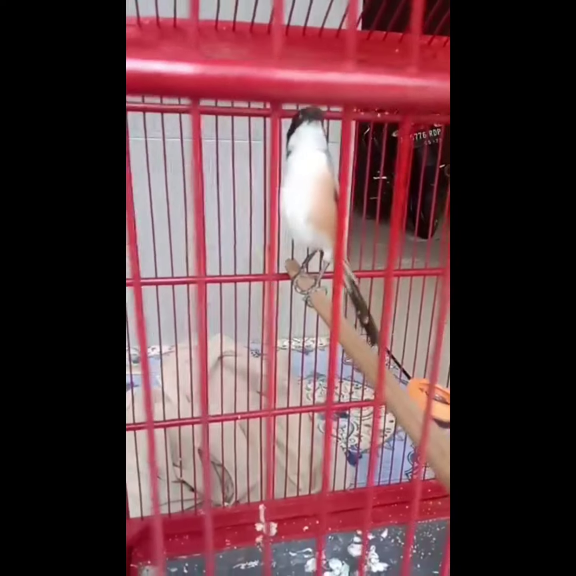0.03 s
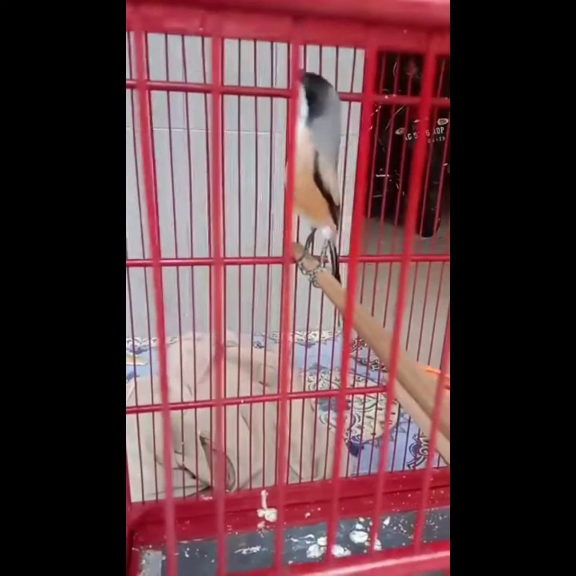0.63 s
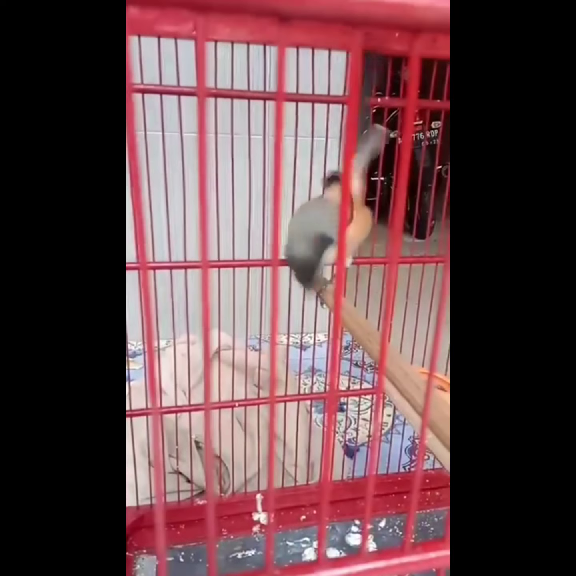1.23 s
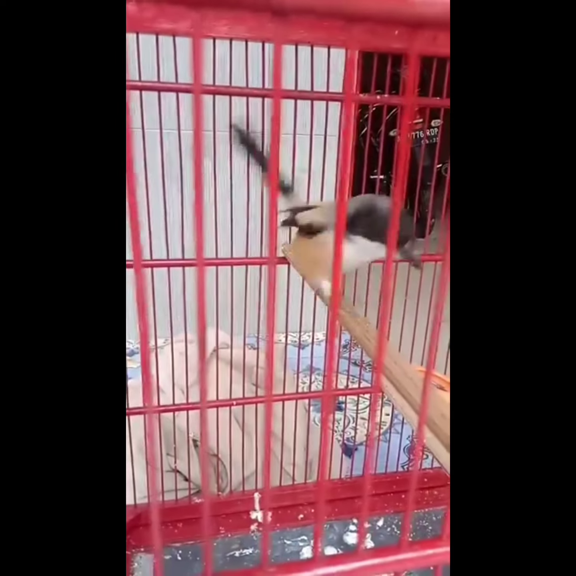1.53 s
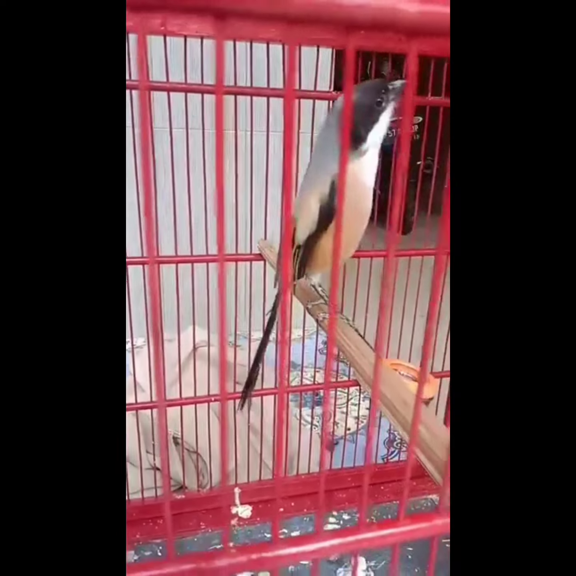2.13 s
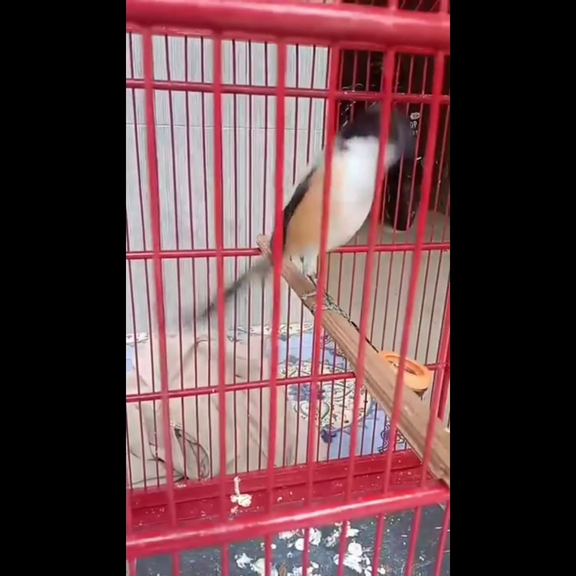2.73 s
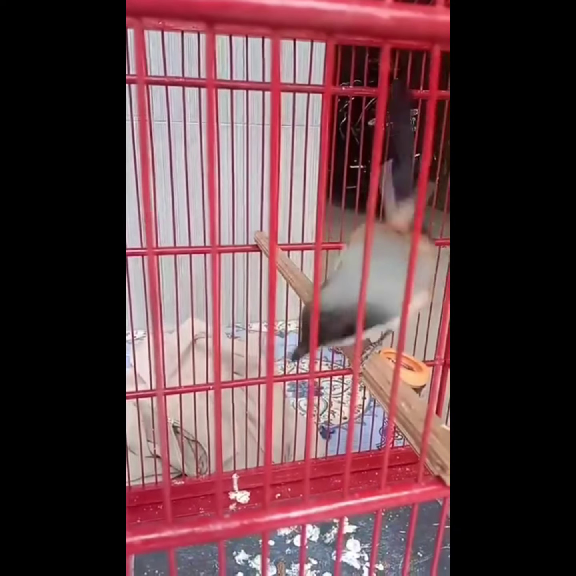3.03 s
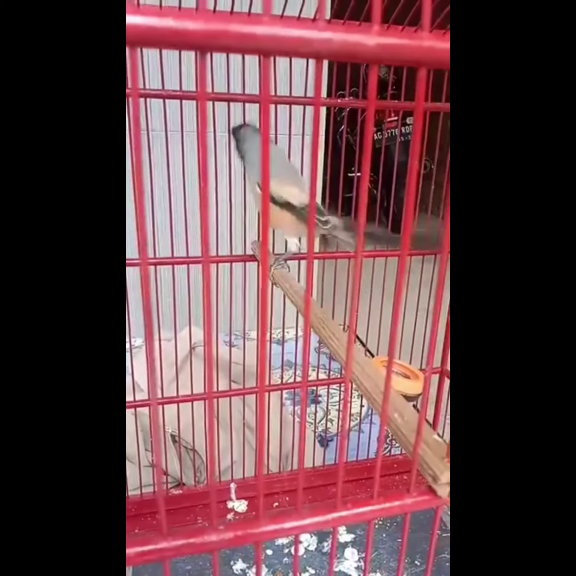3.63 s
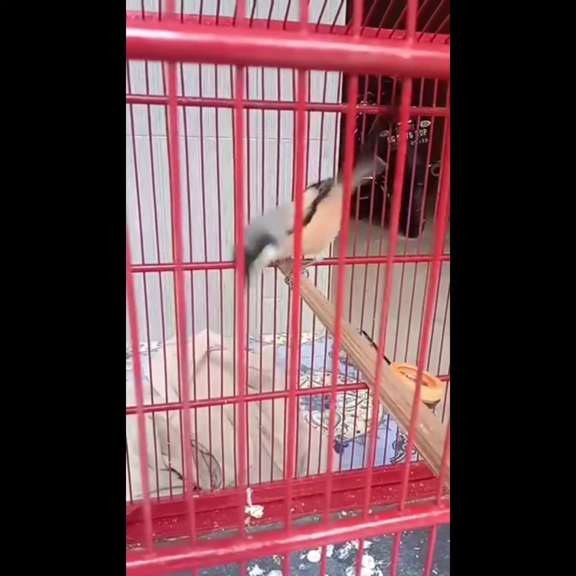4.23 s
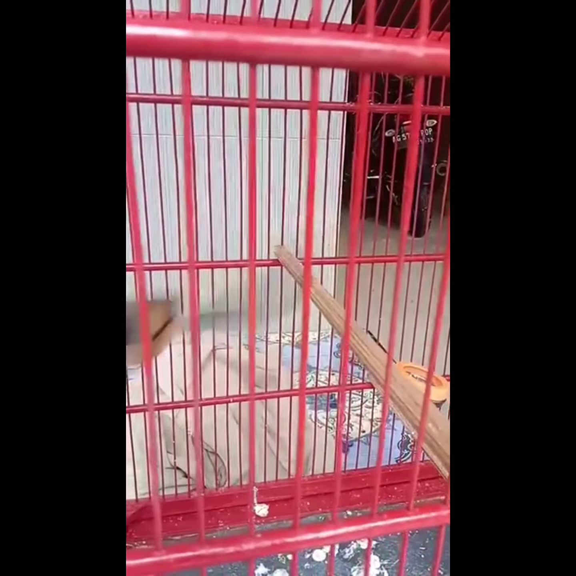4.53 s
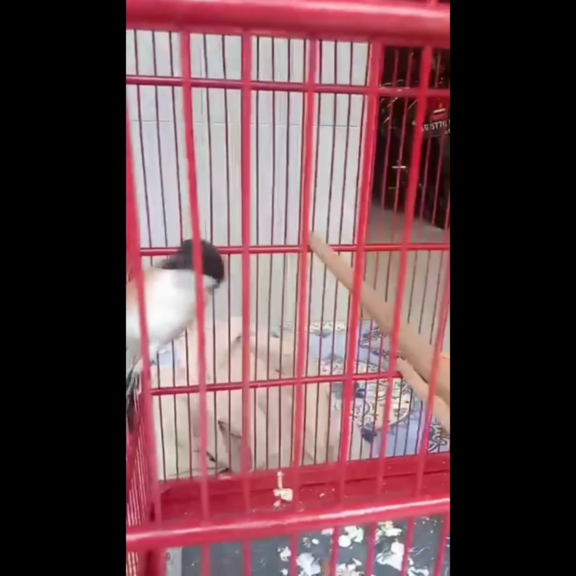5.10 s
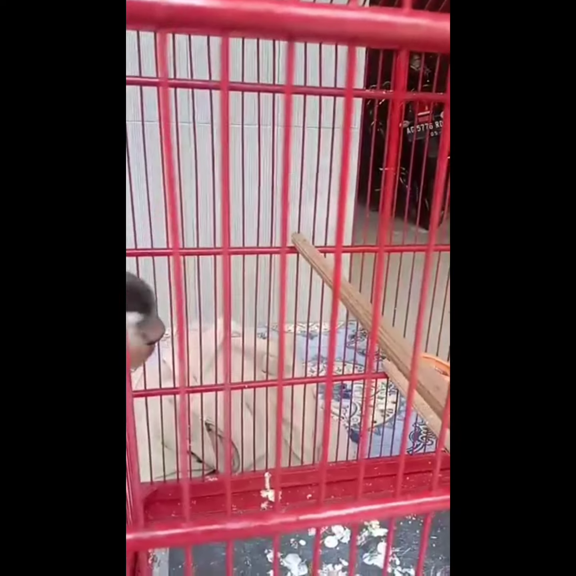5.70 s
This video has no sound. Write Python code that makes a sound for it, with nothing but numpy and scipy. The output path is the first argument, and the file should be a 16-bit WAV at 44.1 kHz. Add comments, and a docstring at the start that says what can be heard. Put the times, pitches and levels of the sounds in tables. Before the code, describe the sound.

A caged songbird sings close to the microphone on a porch, with only a slight echo. It opens with one short peep over faint outdoor hiss and a low, motor-like hum that drops back after half a second. Five bright, high chirps, each a tiny rapid trill, come at about 0.5, 1.2, 1.6, 2.2 and 2.9 seconds. Dry swishes, like wings or a broom, pass among them, clearest around 1.1, 1.8, 2.5 and 3.7 seconds, and set the cage wires ringing faintly. From 3.3 seconds the bird breaks into quick, harsh chatter: twelve pairs of rasping notes, about five pairs a second, each note opened by a tiny tick. The chatter stops near 5.6 seconds. Very soft, distant dove-like coos appear now and then, near the start and around 2.5 and 5.2 seconds. The pauses between calls are hushed and dull.

```python
"""A caged shrike sings close by on a porch. First come a low, motor-like hum, the last syllable of a chirp and
soft, distant cooing like a dove's. From 0.5 s the bird gives five twittering chirps, among dry swishes as of
wings or a broom. The swishes set the cage wires ringing faintly. From 3.3 s the bird breaks into quick, harsh
pairs of notes, each opened by a tick. Both sides of its voice box (the syrinx) sound at once, so this chatter
beats and rasps. A noise suppressor darkens the pauses."""
import sys
import numpy as np
from scipy import signal
from scipy.fft import rfft, irfft, next_fast_len
from scipy.io import wavfile
from scipy.ndimage import uniform_filter1d, minimum_filter1d

SR = 44100
rng = np.random.default_rng(int(sys.argv[2]) if len(sys.argv) > 2 else 0)


def log_audio(samples):
    """Write samples as a 16-bit WAV file to the path given in sys.argv[1]."""
    # one column per channel
    frames = np.atleast_2d(samples).T
    # limit to full scale, then quantise
    limited = np.clip(frames, -1, 1)
    pcm = np.round(limited * 32767).astype(np.int16)
    wavfile.write(sys.argv[1], SR, pcm)


N = 258426
TIME = np.arange(N) / SR


def amp(db):
    """Turns decibels into a number to multiply by."""
    return 10 ** (np.asarray(db) / 20)


def unit(x):
    """Scales a signal to an average strength (rms) of 1."""
    return x / np.sqrt(np.mean(abs(x) ** 2) + 1e-20)


def value_at(points, hz):
    """Reads between (f/Hz, value) rows, giving each octave equal room."""
    f, value = np.transpose(points)
    return np.interp(np.log(hz + 1), np.log(f + 1), value)


def level_curve(rows):
    """Joins (t/s, level/dB) rows into a volume curve for the whole scene."""
    return amp(np.interp(TIME, *np.transpose(rows)))


def colour(x, points):
    """Turns each frequency up or down by (f/Hz, level/dB) rows."""
    size = next_fast_len(len(x) + 4096)
    gain = amp(value_at(points, np.fft.rfftfreq(size, 1 / SR)))
    return irfft(rfft(x, size) * gain, size)[:len(x)]


def noise(points):
    """Noise of strength 1, coloured by (f/Hz, level/dB) rows."""
    return unit(colour(rng.standard_normal(N), points))


def wander(count, rate_hz):
    """A smooth random wobble of strength 1, mostly slower than rate_hz."""
    hz = np.fft.rfftfreq(count + 4096, 1 / SR)
    spectrum = rfft(rng.standard_normal(count + 4096))
    return unit(irfft(spectrum * np.exp(-(hz / rate_hz) ** 2)))[:count]


def tone(hz):
    """A pure tone that follows a pitch curve; .real gives the wave one hears."""
    return np.exp(2j * np.pi * (np.cumsum(hz) / SR + rng.random()))


def edges(t, length, rise, fall):
    """A soft fade in and out, half open at 0 and at length."""
    return (1 + np.tanh(t / rise)) * (1 + np.tanh((length - t) / fall)) / 4


def add(mix, start_s, sound):
    """Adds a sound to the mix, dropping whatever sticks out at either end."""
    start = round(start_s * SR)
    sound = sound[..., max(-start, 0):]
    part = mix[..., max(start, 0):][..., :sound.shape[-1]]
    part += sound[..., :part.shape[-1]]


# Colour of the outdoor air: f/Hz, relative level/dB
AIR_COLOUR = [(30, -13), (150, -6.5), (300, -10), (800, -14.5), (1500, -14.5), (2200, -11), (3100, 3),
              (4500, -3), (7000, -0.5), (8200, -8), (10000, -26), (15500, -30)]
# Tones in the hum: f/Hz, level/dB
HUM_TONES = [(80.7, -71.5), (123.8, -63.5), (161.5, -73.5)]
# How the hum is turned up and down: t/s, level change/dB
HUM_VOLUME = [(.12, 1.5), (.16, -12.5), (.28, -2.5), (.49, -1), (.54, -9), (2.6, -12), (3.2, -16.5)]
def background(air_db=-52.5):
    """Steady outdoor air and a low, motor-like hum that is loudest at the start."""
    hum = np.zeros(N)
    for hz, db in HUM_TONES:
        hum += np.sqrt(2) * amp(db) * tone(hz * (1 + .016 * wander(N, rate_hz=14))).real
    air = noise(AIR_COLOUR) * amp(air_db + .8 * wander(N, rate_hz=20))
    return air + level_curve(HUM_VOLUME) * hum


# Dove-like calls: t/s, length/s, f/Hz, level/dB
DISTANT_COOS = [(0.061, 0.0604, 485.8, -58.5), (.12, 0.0704, 575, -65.5), (.225, 0.141, 465, -69.5),
                (1.613, 0.0616, 600, -66), (2.363, 0.0282, 487.6, -66), (2.528, 0.1097, 464, -59.5),
                (2.607, .13, 469.5, -67.5), (4.114, 0.075, 596, -74.5), (4.227, 0.0625, 583, -64.5),
                (4.65, 0.044, 474.8, -69.5), (4.954, 0.043, 492.6, -68), (5.129, 0.0352, 580, -68),
                (5.244, 0.1135, 481.1, -55), (5.67, 0.038, 581.7, -67.5)]
def coos(sag_hz_per_s=120):
    """Soft calls from far away, blurred and fluttering after travelling many paths."""
    out = np.zeros(N)
    for start, length, hz, db in DISTANT_COOS:
        t = np.arange(-.03, length + .08, 1 / SR)
        pitch = hz - sag_hz_per_s * (t - length / 2)
        call = tone(pitch * (1 + .018 * wander(len(t), rate_hz=60))).real
        gain = amp(db + 2 * wander(len(t), rate_hz=45)) * edges(t, length, rise=.008, fall=.0089)
        add(out, start + t[0], np.sqrt(2) * call * gain)
    return out


# Colours of the hollow scrape and the bristly hiss: f/Hz, relative level/dB
SCRAPE_COLOUR = [(200, -39), (680, -40), (840, -4), (1000, -16), (1130, -10.5), (1300, -1.5), (1600, 3.5),
                 (1850, -2), (2100, 3), (3200, -34)]
HISS_COLOUR = [(1200, -33.5), (2400, -8), (3200, -4.5), (4600, -4.5), (6000, -6), (7800, -6), (9000, -8),
               (11500, -27), (15500, -29.5)]
# Dry strokes: t/s, length/s, scrape level/dB, hiss level/dB
STROKES = [(0.705, 0.06, -66, -54.5), (1.064, 0.114, -50, -41), (1.203, 0.135, -56, -49),
           (1.791, 0.111, -60, -45), (2.445, 0.138, -46.5, -41.5), (3.173, 0.039, -75, -50.5),
           (3.675, 0.09, -54.5, -35.5), (4.404, 0.039, -47, -52)]
def swishes(lead_s=.015):
    """A bristly hiss opens and closes each stroke; a hollow scrape fills its middle."""
    scrape, hiss, out = noise(SCRAPE_COLOUR), noise(HISS_COLOUR), np.zeros(N)
    for start, length, scrape_db, hiss_db in STROKES:
        t = TIME - start
        out += amp(scrape_db) * scrape * edges(t, length, rise=.025, fall=.014)
        out += amp(hiss_db) * hiss * edges(t + lead_s, length + 2 * lead_s, rise=.025, fall=.032)
    flutter_db = .5 * wander(N, rate_hz=40) + 2.2 * wander(N, rate_hz=150)
    return out * amp(flutter_db)


def syrinx(voices, gain, overtone_db, rasp_db, roughness):
    """The voice box. Gives three rows: voices, overtones from its colliding membranes, airflow strength."""
    pressure = amp(.4 * (overtone_db + 18.5))  # pushing harder lifts the highest overtones most
    overtones = unit(voices ** 2) + pressure * (.71 * unit(voices ** 3) + .33 * unit(voices ** 4))
    uneven_collisions = np.exp(1j * roughness * wander(len(gain), rate_hz=980))
    overtones = amp(overtone_db) * np.sqrt(2) * (overtones * uneven_collisions).real
    airflow = amp(rasp_db) * abs(unit(voices))
    return gain * np.array([unit(voices.real), overtones, airflow])


def syllable(song, start, length, start_hz, end_hz, db, lower_db):
    """Adds a nearly pure sliding whistle over a weak, unsteady lower voice that arches in pitch."""
    t = np.arange(-.005, length + .008, 1 / SR)
    off_centre = np.clip(2 * t / length - 1, -1, 1) ** 2  # 0 in the middle, 1 at the ends
    hz = np.interp(t, [0, length], [start_hz, end_hz])
    whistle = tone(hz * (1 + .021 * wander(len(t), rate_hz=550)))
    lower = tone((.8 - .18 * off_centre) * hz * (1 + .092 * wander(len(t), rate_hz=850)))
    lower *= amp(lower_db - 2.5 + 7 * wander(len(t), rate_hz=13))
    swell_db = 2 - 4 * off_centre + 1.1 * wander(len(t), rate_hz=38)
    gain = amp(db + swell_db) * edges(t, length, rise=.0011, fall=.0018)
    add(song, start + t[0], syrinx(whistle + lower, gain, overtone_db=-28, rasp_db=-34, roughness=.45))


# A chirp's last syllable at the very start, then five chirps: t/s, syllable count, first to second syllable/s,
# f/Hz, level/dB
CHIRP_ROLLS = [(-.002, 1, 0.023, 3083, -26.5), (0.535, 5, 0.029, 3098, -16), (1.162, 5, 0.0221, 3108, -15),
               (1.636, 4, .028, 3152, -16.5), (2.246, 4, .0305, 3143, -16), (2.866, 4, 0.0262, 3120, -16)]
def chirps(song, period_s=.0298, fall_hz=321.4, step_db=-2.1444, lower_db=-13):
    """Adds each chirp: a soft rising pip, a short syllable, then an even roll of falling, fading ones."""
    for start, count, first_gap, hz, db in CHIRP_ROLLS:
        syllable(song, start - .02126, .013, hz + 100, hz + 300, db - 15, lower_db=-9)  # the pip
        top, bottom = hz + fall_hz / 2, hz - fall_hz / 2
        syllable(song, start, .017, top, (top + hz) / 2, db - 1.5, lower_db)
        for k in range(round(count) - 1):
            onset = start + first_gap + k * period_s
            syllable(song, onset, .023, top, bottom, db + step_db * k, lower_db + step_db * k)


def tick(song, start, hz, db, width_s=.002103, sweep_hz=150):
    """Adds the membranes snapping open: both voices sound for an instant and ring on briefly."""
    t = np.arange(-.005, .012, 1 / SR)
    pitch = (hz + sweep_hz * np.tanh(t / width_s)) * (1 + .04 * wander(len(t), rate_hz=800))
    voices = tone(pitch) + .4 * tone(1.2 * pitch)
    snap = np.exp(-(t / width_s) ** 2)
    ring = .202 * edges(t, .0056, rise=.0022, fall=.00043)
    gain = amp(db) * (snap + ring)
    add(song, start + t[0], syrinx(voices, gain, overtone_db=-14, rasp_db=-22.5, roughness=.946))


def harsh_note(song, start, shape, length, hz, beat_hz, fall_hz, db, upper_db, overtone_db):
    """Adds two falling voices that beat hundreds of times a second; ragged at first, then cleaner."""
    t = np.arange(-.005, length + .01, 1 / SR)
    progress = np.clip(t / length, 0, 1)
    ragged = np.exp(-np.maximum(t, 0) / .011)
    # Both voices share the unsteady air pressure, so their beat stays regular.
    shared_wobble = 1 + .012 * wander(len(t), rate_hz=70)
    shared_wobble += (.008 + .034 * ragged) * wander(len(t), rate_hz=700)
    upper_wobble = 1 + (.005 + .032 * ragged) * wander(len(t), rate_hz=500)
    lower_hz = hz + fall_hz * (.5 - progress)
    upper_hz = hz + beat_hz + 1.1 * fall_hz * (.5 - progress ** .62)
    lower = tone(lower_hz * shared_wobble)
    upper = tone(upper_hz * shared_wobble * upper_wobble)
    # The voices shake each other: extra tones below and above them sharpen each beat to a pulse.
    side_tones = amp(-19) * lower ** 2 / upper + amp(-22 + 11 * ragged) * upper ** 2 / lower
    voices = lower + amp(upper_db) * upper + side_tones
    fade_db, swell_db = shape
    shape_db = np.interp(progress, [.15, .5, .85, 1], [fade_db / 2, swell_db, -fade_db / 2, 2 - fade_db / 2])
    flutter_db = (1 + 2.5 * ragged) * wander(len(t), rate_hz=500)
    gain = amp(db + shape_db + flutter_db) * edges(t, length, rise=.00241, fall=.004)
    sound = syrinx(voices, gain, overtone_db - 1.5, rasp_db=-25 + 12 * ragged, roughness=ragged / 2)
    add(song, start + t[0], sound)


# The first note of a pair dies away, the second holds up: fade/dB, swell in the middle/dB
NOTE_SHAPES = [(7.5, -1.5), (6.5, 2)]
# Chatter notes, in pairs: t/s, lead-in/s, length/s, lower voice f/Hz, gap to the upper voice/Hz,
# fall in pitch/Hz, level/dB, upper voice against lower/dB, overtone level/dB
CHATTER_NOTES = [(3.263, 0.019, 0.039, 2993, 549, 430, -19, 11.5, -24),
                 (3.334, 0.015, 0.032, 3089, 626.7, 294, -13.5, 1, -16.5),
                 (3.483, 0.012, 0.037, 2989, 695.7, 347.3, -14.5, 2.5, -16.5),
                 (3.55, 0.013, 0.041, 3100, 642.4, 101.7, -14.5, 0.5, -16),
                 (3.698, 0.0051, 0.037, 3055, 599.5, 477.5, -14.5, -1, -14.5),
                 (3.769, 0.011, 0.036, 3255, 600.7, 150, -13, 1, -15),
                 (3.893, 0.0056, 0.045, 3171, 592.7, 275.8, -17, -0.5, -21.5),
                 (3.961, 0.015, 0.033, 3276, 625.1, 227.1, -13, 2.5, -17),
                 (4.114, 0.0063, 0.037, 3054, 489.7, 235.7, -16.5, 2, -17),
                 (4.186, 0.013, 0.035, 3093, 639.5, 209, -14, -3, -14),
                 (4.293, 0.0095, 0.026, 3144, 518.9, 204.4, -13, 0.5, -16.5),
                 (4.347, 0.021, 0.017, 3321, 460.7, 100, -12, -2, -13.5),
                 (4.522, 0.007, 0.042, 2950, 693.7, 29.66, -18, -2, -14),
                 (4.592, 0.013, 0.036, 3114, 453.9, 94.9, -12, 8, -14),
                 (4.693, 0.007, 0.017, 3058, 538.5, 422.4, -11.5, 3.5, -12.5),
                 (4.748, 0.023, 0.012, 3207, 500.4, 406.8, -11, -2.5, -17.5),
                 (4.917, 0.0078, 0.039, 3162, 659.3, 145.3, -13.5, -3, -17.5),
                 (4.989, 0.011, 0.032, 3263, 632.3, 236, -12.5, -0.5, -15),
                 (5.087, 0.007, 0.029, 3151, 470.8, 474.5, -11.5, -0.5, -17.5),
                 (5.142, 0.02, 0.013, 3072, 427.1, 323.2, -13.5, -0.5, -21),
                 (5.346, 0.006, 0.043, 2977, 614.8, 374, -15.5, -1, -13.5),
                 (5.419, 0.009, 0.032, 2972, 709.3, 90.15, -15.5, -0.5, -9.5),
                 (5.522, 0.008, 0.028, 2915, 504.3, 376.8, -19.5, 2, -10.5),
                 (5.575, 0.016, 0.018, 3029, 380.3, 189.9, -14.5, -0.5, -10)]
def chatter(song, stutter_from_s=.01):
    """Adds each harsh note after a tick; a long lead-in stutters with a second, louder tick."""
    for k, (start, lead_in, length, hz, beat_hz, fall_hz, db, *balance) in enumerate(CHATTER_NOTES):
        tick(song, start, hz + 220, db)
        if lead_in > stutter_from_s:
            tick(song, start + .55 * lead_in, hz + 330, db + 2.5)
        harsh_note(song, start + lead_in, NOTE_SHAPES[k % 2], length, hz, beat_hz, fall_hz, db, *balance)


# How throat and beak colour the two voices, and their overtones: f/Hz, level change/dB
VOICE_COLOUR = [(1500, -26), (2100, -22), (2600, 0), (4200, -1.5), (5000, -20), (6000, -2.5), (9000, -19.5)]
OVERTONE_COLOUR = [(2000, -41), (4800, -15.5), (5600, -1.5), (6400, -4), (7100, 4.5), (7900, -2),
                   (8700, -22.5), (10500, -18), (11300, -12.5), (12800, -28.5), (14600, -17),
                   (16000, -20.5)]
# Colour of the air hissing in the voice: f/Hz, relative level/dB
BREATH_COLOUR = [(100, -29.5), (900, -34), (1900, -50), (2700, -24), (3600, 12.5), (4200, 1), (5100, -3),
                 (6000, -1.5), (7300, 0.5), (8200, -21), (11000, -19), (13000, -31.5), (14800, -22),
                 (16000, -22)]
# The range of the highest overtones: f/Hz, level change/dB
HIGHEST_BAND = [(8400, -40), (10400, 0)]
# How that range is turned up and down: t/s, level change/dB
HIGHEST_VOLUME = [(3.5, 0.5), (4.6, 2.5), (5.2, -3.5), (5.43, 3)]
def shrike():
    """The bird's chirps and chatter, mixed with its breath and coloured by its throat and beak."""
    song = np.zeros((3, N))
    chirps(song)
    chatter(song)
    voices, overtones, airflow = song
    treble = colour(overtones, OVERTONE_COLOUR) + airflow * noise(BREATH_COLOUR)
    treble += (level_curve(HIGHEST_VOLUME) - 1) * colour(treble, HIGHEST_BAND)
    return colour(voices, VOICE_COLOUR) + treble


# How long the porch echoes: f/Hz, time to fade by 60 dB/s
ECHO_TIMES = [(300, .4), (2000, 0.076), (3300, 0.368), (5000, 0.27), (7000, 0.35), (10000, 0.3),
              (16000, 0.22)]
def porch(x, early_db=-17, tail_db=-21, echoes_per_s=3000):
    """Quick echoes from the cage and floor, then a thin tail from the walls."""
    t = np.arange(SR) / SR
    echoes = rng.standard_normal(SR) * (rng.random(SR) < echoes_per_s / SR)
    early = echoes * (t > .002) * np.exp(-t / .024)
    hz, when, bands = signal.stft(echoes * (t > .014), SR, nperseg=256)
    decay = amp(-60 * when / value_at(ECHO_TIMES, hz)[:, None])
    tail = signal.istft(bands * decay, SR, nperseg=256)[1][:SR]
    response = amp(early_db) * early / np.linalg.norm(early) + amp(tail_db) * tail / np.linalg.norm(tail)
    return x + signal.fftconvolve(x, response)[:N]


# Ringing cage wires: f/Hz, strength of the ring/dB, time to fade by 60 dB/s
CAGE_WIRES = [(1098, 5, 1), (1636, 6.5, .6)]
def cage(x):
    """The wires pick up sound at their own pitches, mainly from the swishes, and ring on faintly."""
    t = np.arange(SR) / SR
    ring = np.zeros(SR)
    for hz, db, fade_s in CAGE_WIRES:
        decay = amp(-60 * t / fade_s)
        ring += amp(db) * 2 * decay / decay.sum() * np.cos(2 * np.pi * hz * t)
    return x + signal.fftconvolve(x, ring)[:N]


def scene():
    """The bird and its surroundings, in one channel."""
    return cage(porch(shrike() + swishes() + coos()) + background())[None]


def noise_suppressor(x, margin_db=4.5, slope=1.4, depth_db=9):
    """Turns down each band that barely rises above the opening background, which leaves it patchy."""
    _, when, bands = signal.stft(x, SR, nperseg=512, noverlap=384)
    power_db = 10 * np.log10(abs(uniform_filter1d(abs(bands) ** 2, size=18, axis=1)) + 1e-20)
    floor_db = uniform_filter1d(np.median(power_db[:, when < .5], axis=1), size=7)[:, None]
    cut_db = np.clip(slope * (floor_db + margin_db - power_db), 0, depth_db)
    return signal.istft(bands * amp(-cut_db), SR, nperseg=512, noverlap=384)[1][:N]


def noise_gate(x, threshold_db=-47, depth_db=21, release_db_per_s=330, start_s=.804, settle_s=.061):
    """From start_s on, turns the pauses down by 2 dB for each dB they lie under the threshold."""
    power_db = 10 * np.log10(abs(uniform_filter1d(x ** 2, size=1000)) + 1e-12)
    release_db = release_db_per_s * TIME
    held_db = np.maximum.accumulate(power_db + release_db) - release_db  # jumps up, sinks gradually
    cut_db = uniform_filter1d(np.clip(2 * (threshold_db - held_db), 0, depth_db), size=1000)
    switched_on = np.clip((TIME - start_s) / settle_s, 0, 1)
    return x * amp(-cut_db * switched_on)


# How the microphone colours the sound: f/Hz, level change/dB
MICROPHONE_COLOUR = [(20, 6), (8100, -1), (8700, -23.5), (9700, -16.5), (10400, -6), (16000, -3)]
def record(dry, peak_limit=.92, cutoff_hz=15900):
    """Lowers the quiet moments, holds back the peaks, adds the microphone's colour and cuts the very top."""
    x = noise_gate(noise_suppressor(dry[0]))
    limiter_gain = minimum_filter1d(np.minimum(1, peak_limit / (abs(x) + 1e-9)), size=260)
    smooth_gain = uniform_filter1d(uniform_filter1d(limiter_gain, size=130), size=130)
    x = colour(x * smooth_gain, MICROPHONE_COLOUR)
    low_pass = signal.firwin(511, cutoff_hz, window=("kaiser", 9), fs=SR)
    return signal.oaconvolve(x, low_pass, "same")[None]


dry = scene()
out = record(dry)
log_audio(out)
```